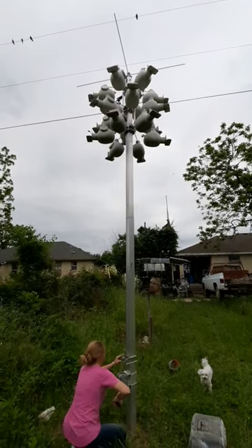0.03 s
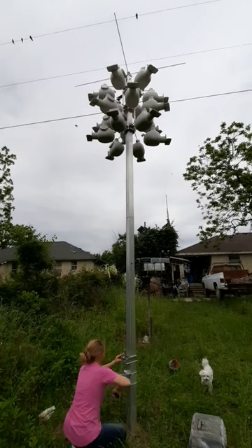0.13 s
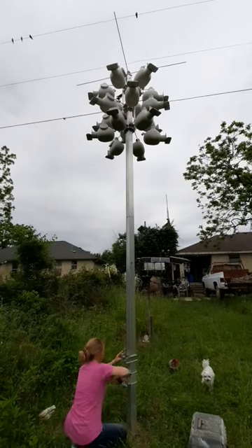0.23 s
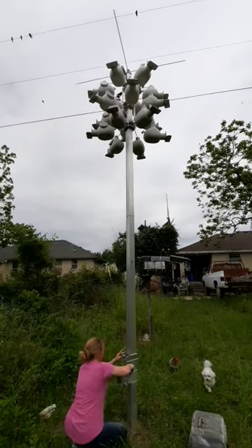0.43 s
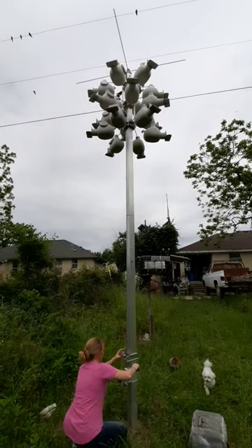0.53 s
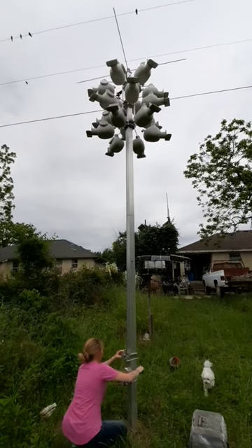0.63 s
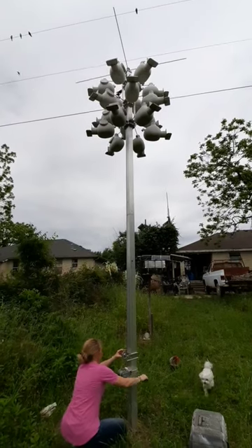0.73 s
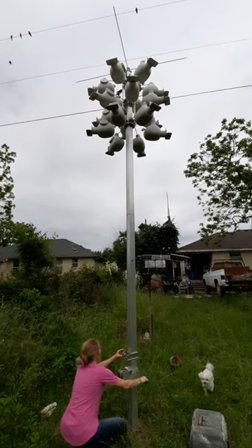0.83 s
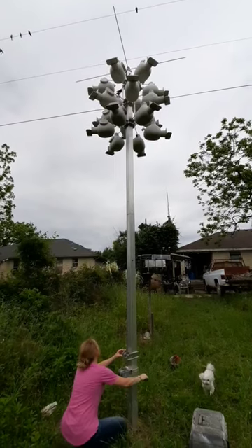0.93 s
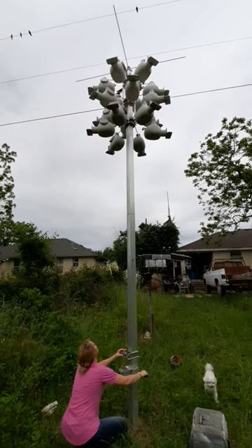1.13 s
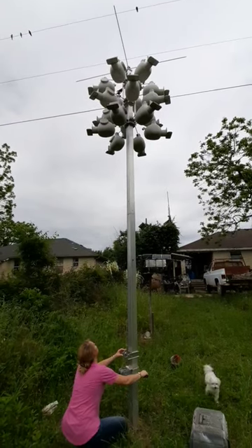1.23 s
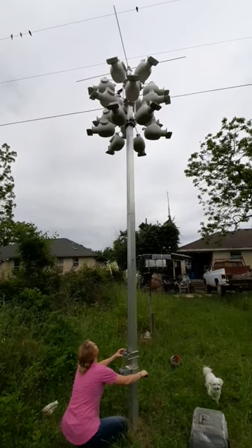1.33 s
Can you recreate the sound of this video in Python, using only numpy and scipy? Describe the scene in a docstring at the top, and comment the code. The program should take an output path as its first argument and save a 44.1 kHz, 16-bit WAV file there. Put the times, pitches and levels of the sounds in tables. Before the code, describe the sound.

Sharp ratchet clicks from a hand crank on a metal pole, small birds chirping nearby.

```python
"""Cranking a hand winch

A winch on a tall metal pole clicks through eight ratchet teeth in an open yard. At each tooth the
catch scrapes over the tip, then snaps down and rings the steel frame and the pole. Small birds
chirp nearby, insects hiss in the grass and a light wind rumbles on the microphone."""
import sys
import numpy as np
from scipy import signal
from scipy.fft import rfft, irfft
from scipy.io import wavfile
from scipy.ndimage import uniform_filter1d

SR = 44100
rng = np.random.default_rng(int(sys.argv[2]) if len(sys.argv) > 2 else 0)


def transcribe(u):
    """Save the signal u as a 16-bit wav file named by the first command-line argument.

    u: samples, shape (n,) or (channels, n), limited to [-1, 1]; the rate is SR.
    q: integer samples, one column per channel.
    """
    v = np.clip(np.atleast_2d(u).T, -1, 1)
    q = np.round(v * 32767).astype(np.int16)
    wavfile.write(sys.argv[1], SR, q)


N = 61739
TIME = np.arange(N) / SR
HIT_TIME = np.arange(SR // 4) / SR  # seconds since a hit began
HIT_SIZE = len(HIT_TIME)

# Ratchet teeth: start_s, snap_db, scrape_lead_s, scrape_db, pole_db, pan_db, then five tone_db
TEETH = [(0.227, -4, 0.011, -6, -3.5, -0.5, 0, 3.5, 0.11, -0.096, -1.4),
         (0.2933, -1.5, 0.0073, 0.5, -4.5, 0, 1, 4, -0.28, -0.21, 0.42),
         (.3533, -0.5, 0.0098, 2, -2.5, -3, 1.5, 1, -2.4, 0.48, -0.61),
         (0.4431, 0, 0.0085, -1.5, -8, -1, -4, -3, -1.2, -1, 0),
         (0.5496, 0.5, 0.011, 2.5, -5.5, -1.5, -3, -1, -0.25, 0.49, 0.056),
         (0.6537, 0, 0.011, 1.5, -4.5, -1.5, -6, -1.5, 0.68, -2.8, 0),
         (0.7487, 1, 0.0075, 5, -1.5, 0, 0, -3, 0.19, -2.1, 0.96),
         (0.8192, 2.5, 0.014, 8, 1.5, 0, -3.5, -1, -1, 0.98, -0.71)]
# Where each tone_db lifts or lowers the snap: freq_hz
TONE_BANDS = [1900, 3400, 5800, 8000, 12000]
# Ringing notes of the frame and the pole: pitch_hz, level_db, fade_s (time to drop by 60 dB)
FRAME_NOTES = [(1783, -4, .11), (1921, -9, .09), (2053, -6.5, .11), (2675, -13, .14), (2875, -16, .28),
               (3425, -4, .1), (3518, -4.5, .13), (5372, -1, .07), (6062, -1, .07), (6900, -4, .06),
               (7500, -1, .09), (7800, 1, .075), (8435, -4, .08), (10630, -8, .07)]
POLE_NOTES = [(311.4, -41, 0.16), (560, -49, .07), (1075, -45.5, 0.065)]
# Tone of the gear's clatter, the catch's scrape, the pole's thud and the handle: freq_hz, level_db
CLATTER_TONE = [(200, -21), (600, -19), (1000, -15), (1400, -11.5), (1800, 2.5), (2350, -6), (3500, -3),
                (4000, -1.5), (4900, -1.5), (6000, 2), (7200, -5.5), (7750, 8.5), (8500, -1.5),
                (9400, -10.5), (10600, -7.5), (14300, -8), (15300, -20), (16200, -12)]
SCRAPE_TONE = [(300, -16), (1300, -12.5), (2000, 8.5), (2600, 2.5), (3600, 4), (4800, -10), (6000, 1),
               (6800, 1), (7800, -1), (9400, -5.5), (14000, -9), (16000, -10)]
THUD_TONE = [(60, -18), (170, -13), (320, 5.5), (480, 4), (750, -2), (1080, 11), (1400, -19), (2500, -33)]
KNOCK_TONE = [(200, -1.5), (1400, -0.5), (2050, -1.5), (2800, 3.5), (3700, -2), (4800, -11), (8000, -12.5),
              (15000, -37)]
# How long the clatter and the yard's echo last: freq_hz, fade_s
CLATTER_FADE = [(500, 0.12), (2000, 0.12), (5000, 0.052), (8000, 0.068), (14000, 0.078)]
YARD_FADE = [(250, 1), (700, 0.91), (2500, 0.35), (5000, 0.34), (8000, 0.33), (14000, .33)]
# Knocks of the settling handle: start_s, level_db
HANDLE_KNOCKS = [(1.092, -56), (1.1164, -37.5)]
# Falling chirps: start_s, length_s, level_db, glide_s
FALLING_CHIRPS = [(.083, .015, -38, .007), (.1075, .026, -37.5, .011), (.1355, .027, -36.5, .011),
                  (.320, .018, -43, .010), (.517, .014, -42, .006), (.541, .014, -39, .008),
                  (.569, .014, -39, .008), (.718, .019, -37, .007), (.775, .024, -37.5, .011)]
# Paths of one rising chirp and a far whistle: time_s, pitch_hz, level_db
RISING_CHIRP = [(.655, 1700, -42), (.660, 2350, -31), (.664, 3100, -28), (.669, 2950, -39),
                (.686, 2900, -56)]
FAR_WHISTLE = [(1.345, 3870, -85), (1.37, 3810, -77), (1.40, 3700, -78)]
# Tone of a chirp's rasp, far birds, steady air, the breeze and wind rumble: freq_hz, level_db
RASP_TONE = [(1000, -11), (2000, 0), (3000, 1), (3900, -9), (5000, -4), (6500, -17), (11000, -18),
             (13000, -26), (16000, -32)]
FAR_BIRD_TONE = [(1500, -27.5), (2300, -3.5), (2900, 0.5), (3400, -7.5), (4300, -15.5), (8000, -50)]
AIR_TONE = [(25, -9), (80, 3), (160, -4), (225, -25.5), (310, -7), (400, -13), (750, -11.5), (1130, -16.5),
            (2160, -25), (3000, -62), (4700, -42), (7100, -44), (10400, -47), (14800, -48), (16000, -62)]
BREEZE_TONE = [(60, -24), (180, -5.5), (330, -3), (750, -7.5), (1200, -10.5), (2200, -21), (6000, -39)]
WIND_TONE = [(12, -45), (30, -14), (58, -0.5), (110, -3), (180, -16), (400, -32), (1500, -71)]
# How far birds, the breeze and the gusts swell and sink: time_s, level_db
FAR_BIRD_LEVELS = [(0, -66.5), (.05, -61.5), (.2, -61.5), (.9, -62.5), (1.2, -73.5), (1.4, -82)]
BREEZE_LEVELS = [(0, -69), (.5, -55), (.7, -54.5), (.85, -50), (.95, -51.5), (1.05, -60), (1.4, -62.5)]
GUST_LEVELS = [(0, -71), (.3, -65), (.52, -53.5), (.62, -67), (.74, -42.5), (.83, -41), (.88, -50.5),
               (1.02, -68), (1.11, -49.5), (1.4, -75)]
# How alike left and right are for air, steel and wind: freq_hz, likeness (1 same, -1 opposite)
AIR_STEREO = [(60, 0.97), (290, 0.91), (640, 0.69), (1410, 0.39), (3100, 0), (15000, 0)]
STEEL_STEREO = [(300, -0.3), (700, 0.22), (1400, -0.62), (2200, -0.25), (3000, .35), (5000, 0.26),
                (8000, -0.2), (15000, 0.18)]
WIND_STEREO = [(30, .4), (200, .5)]


def ratchet(bounce_s=.0026, bounce_db=-1.5):
    """At each tooth the catch scrapes, snaps down, bounces once and shakes the pole."""
    out = np.zeros((2, N))
    landing, rebound = (noise(CLATTER_TONE, HIT_SIZE, STEEL_STEREO) for _ in range(2))
    for start_s, snap_db, scrape_lead_s, scrape_db, pole_db, pan_db, *tone_db in TEETH:
        sides = pan(pan_db)
        add(out, start_s - scrape_lead_s, amp(scrape_db) * sides * scrape())
        add(out, start_s, amp(snap_db) * sides * snap(landing, tone_db))
        add(out, start_s + bounce_s, amp(snap_db + bounce_db) * sides * snap(rebound, tone_db))
        add(out, start_s, amp(pole_db) * pole())
    return out


def snap(shared_clatter, tone_db, shared_part=.45, strike_s=.000566, spread_db=2.5):
    """The catch lands: the frame rings and the gear clatters, partly alike at every tooth."""
    fresh_clatter = noise(CLATTER_TONE, HIT_SIZE, STEEL_STEREO)
    clatter = np.sqrt(shared_part) * shared_clatter + np.sqrt(1 - shared_part) * fresh_clatter
    clatter = die_away(vary_contact(clatter), CLATTER_FADE)
    ring = np.zeros((2, HIT_SIZE))
    for hz, db, fade_s in FRAME_NOTES:
        level = amp(db + spread_db * rng.standard_normal())
        phase = 2 * np.pi * (hz * HIT_TIME + rng.random((2, 1)))
        ring += level * hit_shape(strike_s, fade_s) * np.sin(phase)
    steel = shape_tone(amp(-20) * clatter + amp(-33.5) * ring, list(zip(TONE_BANDS, tone_db)))
    fade_in = np.minimum(HIT_TIME / strike_s, 1)
    fade_out = np.minimum(10 * (1 - HIT_TIME / HIT_TIME[-1]), 1)
    return steel * fade_in * fade_out


def scrape():
    """The catch rubs over a tooth's tip in a short burst of noise."""
    rubbing = vary_contact(noise(SCRAPE_TONE, HIT_SIZE, STEEL_STEREO))
    return amp(-32) * rubbing * hit_shape(rise_s=.003, fade_s=.04)


def pole():
    """The shaken pole gives a few low notes and a hollow thud."""
    ring = sum(amp(db) * ringing(hz, rise_s=.0049, fade_s=fade_s) for hz, db, fade_s in POLE_NOTES)
    thud = amp(-45.5) * noise(THUD_TONE, HIT_SIZE) * hit_shape(rise_s=.0061, fade_s=.05)
    return ring + thud


def handle():
    """The loose handle settles with soft knocks and a short steel ring."""
    out = np.zeros((2, N))
    ring = amp(-8) * ringing(hz=2030, rise_s=.004, fade_s=.07)
    for start_s, db in HANDLE_KNOCKS:
        knock = vary_contact(noise(KNOCK_TONE, HIT_SIZE)) * hit_shape(rise_s=.004, fade_s=.04)
        add(out, start_s, amp(db) * (knock + ring))
    return out


def vary_contact(sound, step_hz=190, spread_db=4):
    """Each spot that is hit brings out other pitches, so the tone gets random peaks and dips."""
    hz = np.arange(0, SR / 2, step_hz)
    db = spread_db * np.clip(rng.standard_normal(len(hz)), -2, 2)
    return unit(shape_tone(sound, list(zip(hz, db))))


def birds(top_hz=3500, bottom_hz=1980, rise_s=.003):
    """Birds sing quick raspy falling chirps, one clean rising chirp and a far whistle."""
    out = np.zeros((2, N))
    for start_s, length_s, db, glide_s in FALLING_CHIRPS:
        t = np.arange(0, length_s, 1 / SR)
        hz = bottom_hz + (top_hz - bottom_hz) * np.exp(-t / glide_s)
        level = amp(db) * np.minimum(t / rise_s, 1) * np.sqrt(1 - t / length_s)
        add(out, start_s, level * bird_voice(hz, rough=1))
    for call in (RISING_CHIRP, FAR_WHISTLE):
        times, hz, db = np.transpose(call)
        t = np.arange(times[0], times[-1], 1 / SR)
        level = amp(np.interp(t, times, db))
        add(out, times[0], level * bird_voice(np.interp(t, times, hz), rough=0))
    return out


def bird_voice(hz, rough):
    """A whistle with a faint octave above; roughness adds rasp and shakes its pitch and level."""
    wobble, flutter = rough * unit(uniform_filter1d(rng.standard_normal((2, len(hz))), size=50))
    phase = 2 * np.pi * np.cumsum(hz * (1 + .025 * wobble)) / SR
    whistle = (1 + .22 * flutter) * (np.sin(phase) + amp(-32) * np.sin(2 * phase))
    return whistle + rough * amp(-13.5) * noise(RASP_TONE, len(hz))


def yard_echo(sound, delay_s=.004):
    """Houses and trees scatter the sound back as a short wash of echoes."""
    fade_in = np.clip(np.arange(SR) / SR / delay_s - 1, 0, 1)
    tail = die_away(rng.standard_normal((2, SR)), YARD_FADE) * fade_in
    return signal.fftconvolve(sound, tail / np.linalg.norm(tail[0]), axes=1)[:, :N]


def wind():
    """Air hums steadily, a breeze rustles and gusts rumble on the microphone."""
    air = amp(-50.5) * noise(AIR_TONE, N)
    breeze = swell(BREEZE_LEVELS) * noise(BREEZE_TONE, N)
    gusts = swell(GUST_LEVELS) * noise(WIND_TONE, N, WIND_STEREO)
    return pan(2) * (air + breeze) + pan(4.5) * gusts


def insects(pitch_hz=8580, half_width_hz=456):
    """Insects in the grass blend into one high, narrow hiss."""
    band = 1 / (1 + ((np.fft.rfftfreq(N, 1 / SR) - pitch_hz) / half_width_hz) ** 2)
    hiss = unit(irfft(rfft(rng.standard_normal((2, N))) * band, N))
    return amp(-62) * pan(5) * hiss


def far_birds():
    """Distant birds blur into a faint band of noise near 3 kHz."""
    return swell(FAR_BIRD_LEVELS) * noise(FAR_BIRD_TONE, N)


def amp(db):
    """Turns decibels into a volume multiplier."""
    return 10 ** (np.asarray(db) / 20)


def unit(sound):
    """Scales a sound to an average power of 1."""
    return sound / np.sqrt(np.mean(sound ** 2) + 1e-20)


def look_up(table, hz):
    """Reads between a table's rows, giving each octave equal room."""
    row_hz, values = np.transpose(table)
    return np.interp(np.log(hz + 1), np.log(row_hz + 1), values)


def pan(db):
    """Volumes for the two sides, with the left louder by db."""
    return amp(np.array([[db / 2], [-db / 2]]))


def add(mix, start_s, sound):
    """Mixes a sound in at its start time."""
    part = mix[:, round(start_s * SR):][:, :sound.shape[-1]]
    part += sound[..., :part.shape[1]]


def shape_tone(sound, tone):
    """Turns each frequency up or down as a tone table says."""
    size = sound.shape[-1]
    gain = amp(look_up(tone, np.fft.rfftfreq(size, 1 / SR)))
    return irfft(rfft(sound) * gain, size)


def noise(tone, size, stereo=AIR_STEREO):
    """Noise with a given tone and a given likeness between left and right."""
    left, other = rfft(rng.standard_normal((2, size)))
    likeness = np.clip(look_up(stereo, np.fft.rfftfreq(size, 1 / SR)), -1, 1)
    right = likeness * left + np.sqrt(1 - likeness ** 2) * other
    return unit(shape_tone(irfft(np.array([left, right]), size), tone))


def die_away(sound, fades):
    """Lets each band of frequencies fade at its own speed."""
    hz, t, bands = signal.stft(sound, SR, nperseg=128)
    bands = bands * amp(-60 * t / look_up(fades, hz)[:, None])
    return signal.istft(bands, SR, nperseg=128)[1][:, :sound.shape[-1]]


def hit_shape(rise_s, fade_s):
    """The volume of a hit: it climbs for rise_s, then drops 60 dB every fade_s."""
    return np.minimum(HIT_TIME / rise_s, 1) * amp(-60 * np.maximum(HIT_TIME - rise_s, 0) / fade_s)


def ringing(hz, rise_s, fade_s):
    """One pure, fading note of struck metal."""
    return hit_shape(rise_s, fade_s) * np.sin(2 * np.pi * hz * HIT_TIME)


def swell(levels):
    """Volume over time, sliding between a table's rows."""
    return amp(np.interp(TIME, *np.transpose(levels)))


def scene():
    """The winch and the birds echo in the yard, over wind, insects and far birds."""
    winch = ratchet() + handle()
    song = birds()
    echo = yard_echo(amp(-16.5) * winch + amp(-6) * song)
    return winch + song + echo + wind() + insects() + far_birds()


def record(dry, low_cut_hz=36, high_cut_hz=15900):
    """Trims away the deepest bass and the highest treble."""
    bass_cut = signal.butter(2, low_cut_hz, "high", fs=SR, output="sos")
    treble_cut = signal.firwin(255, high_cut_hz, window=("kaiser", 9), fs=SR)
    return signal.oaconvolve(signal.sosfilt(bass_cut, dry), treble_cut[None], "same")


dry = scene()
out = record(dry)
transcribe(out)
```